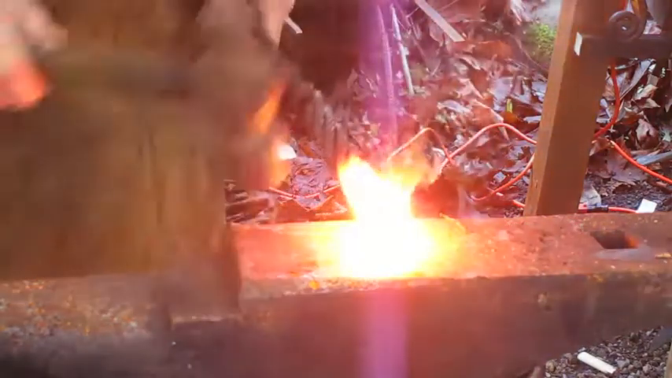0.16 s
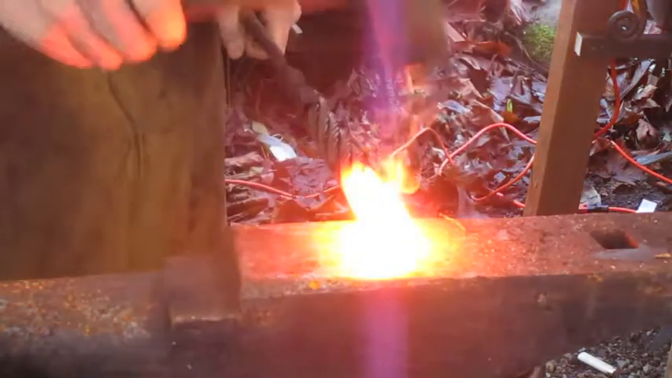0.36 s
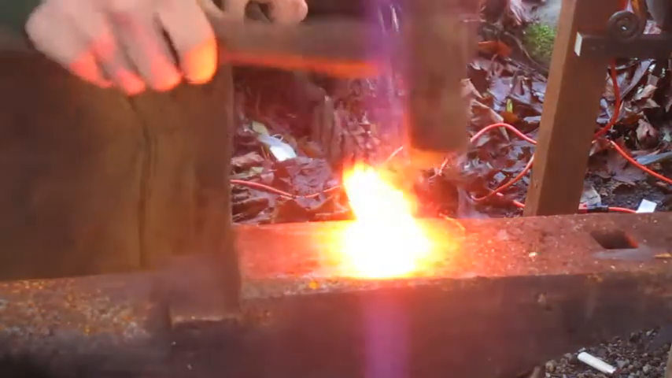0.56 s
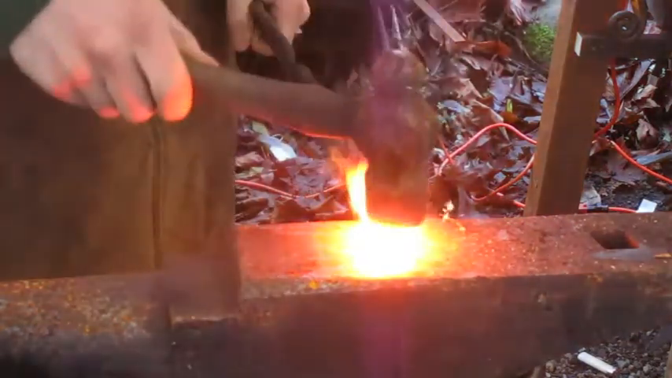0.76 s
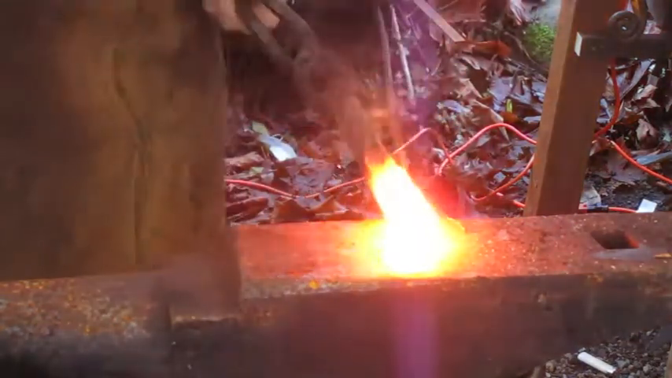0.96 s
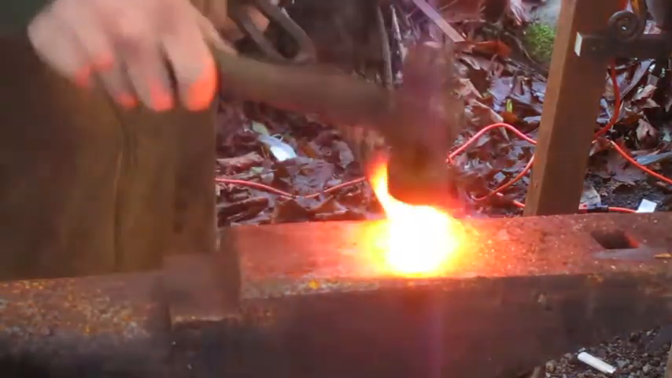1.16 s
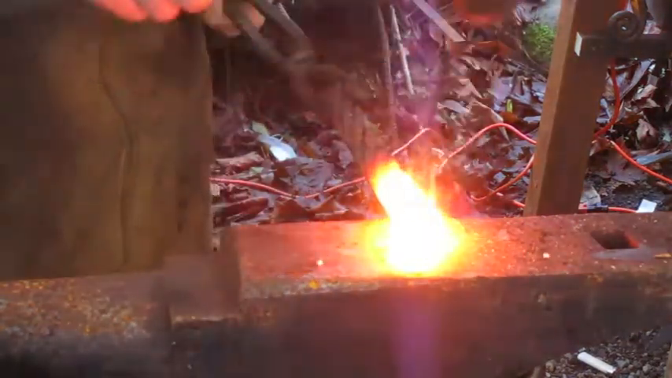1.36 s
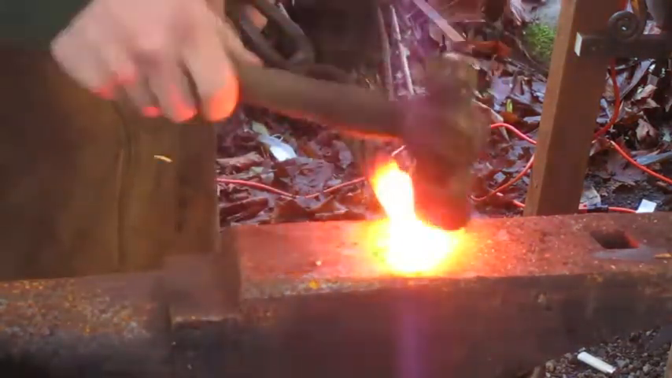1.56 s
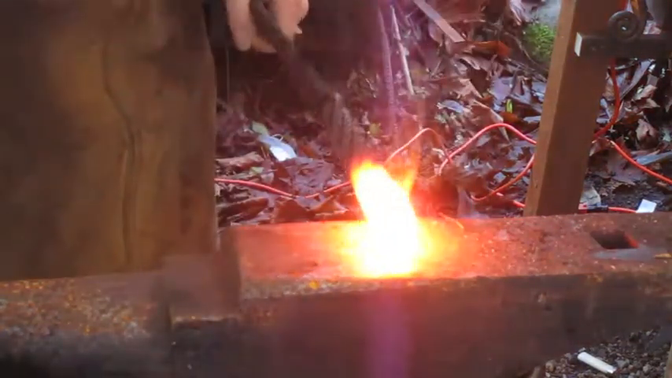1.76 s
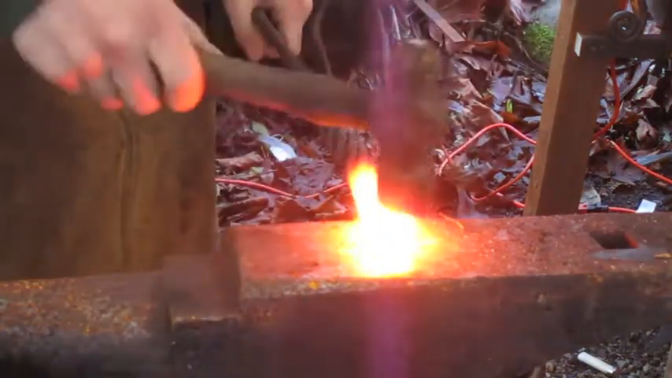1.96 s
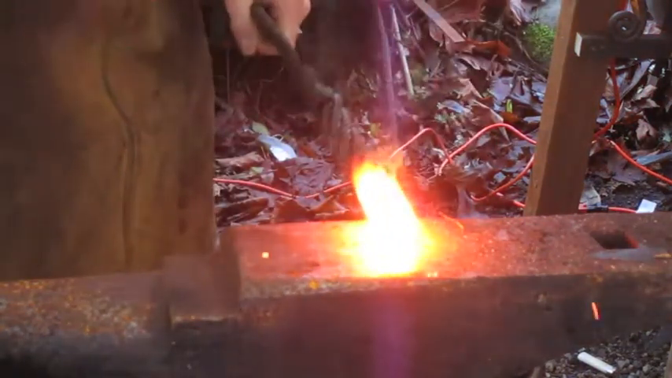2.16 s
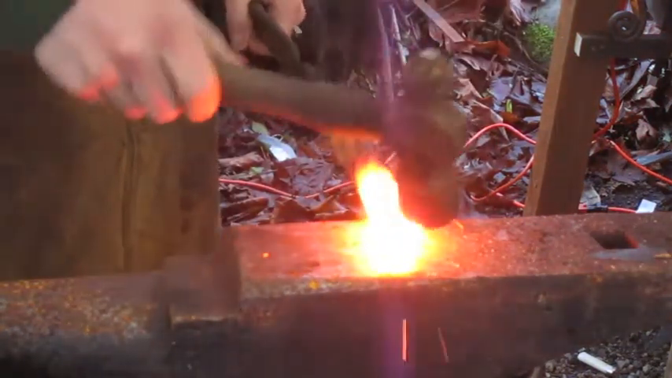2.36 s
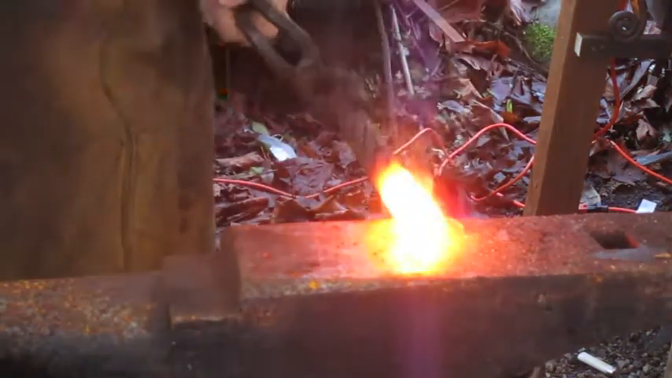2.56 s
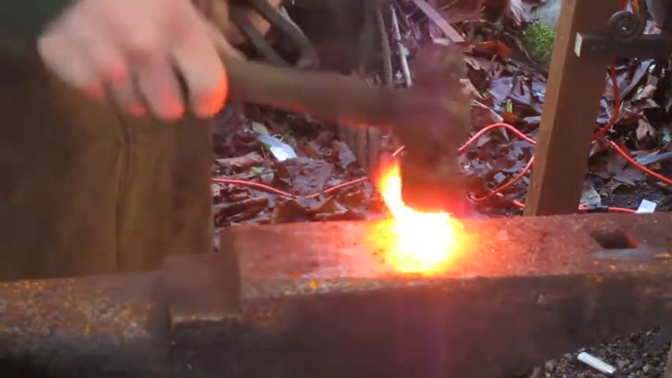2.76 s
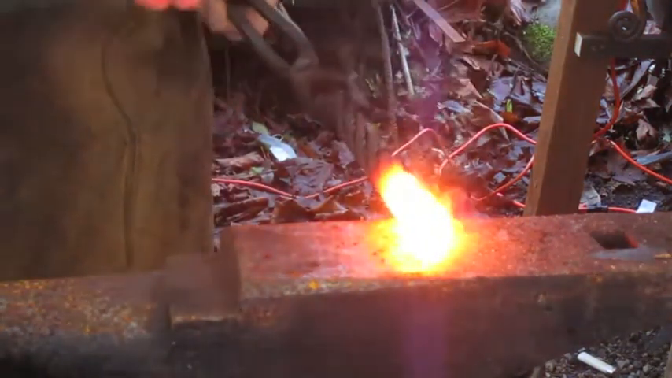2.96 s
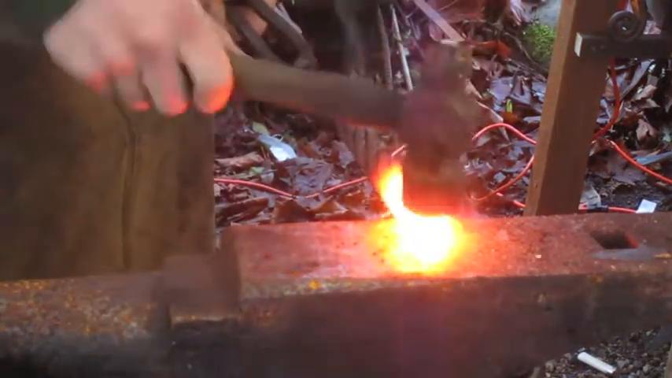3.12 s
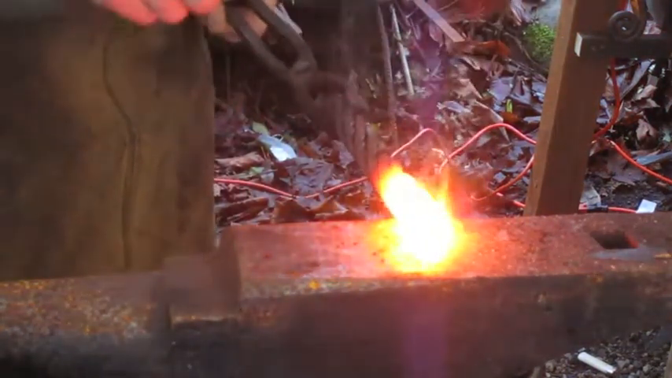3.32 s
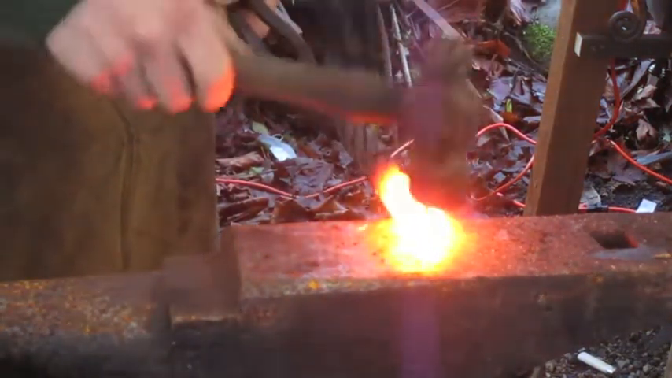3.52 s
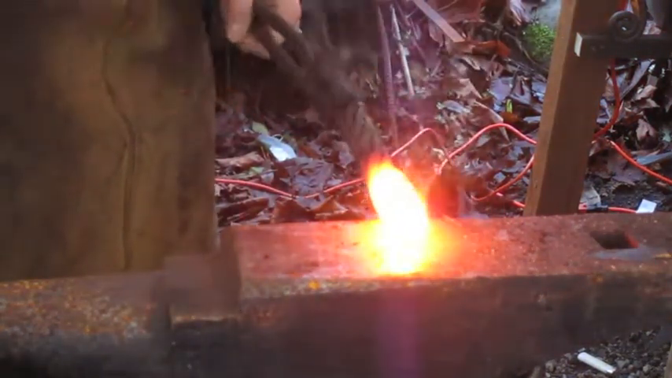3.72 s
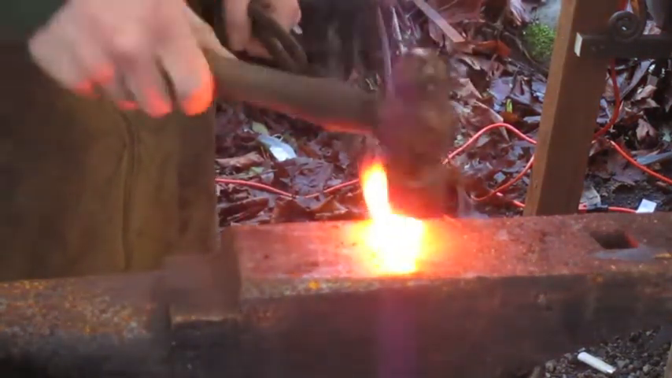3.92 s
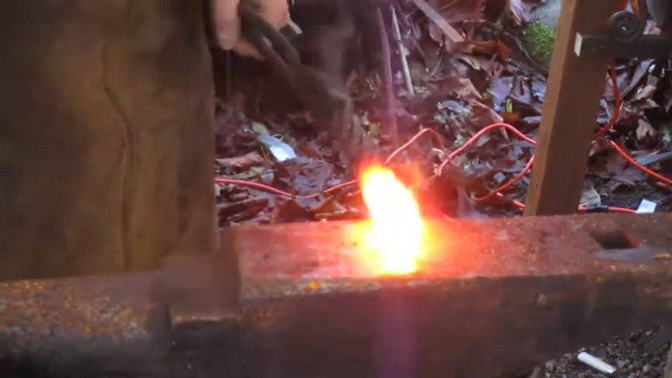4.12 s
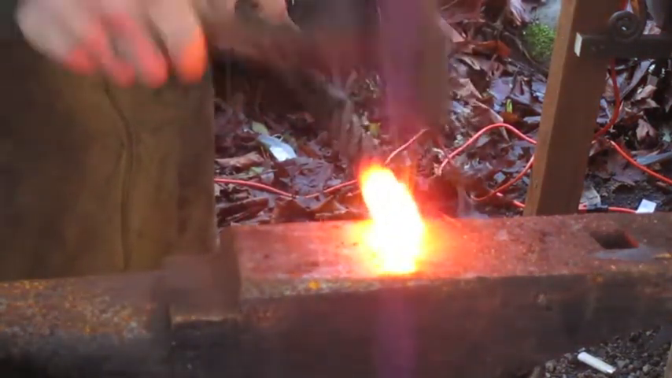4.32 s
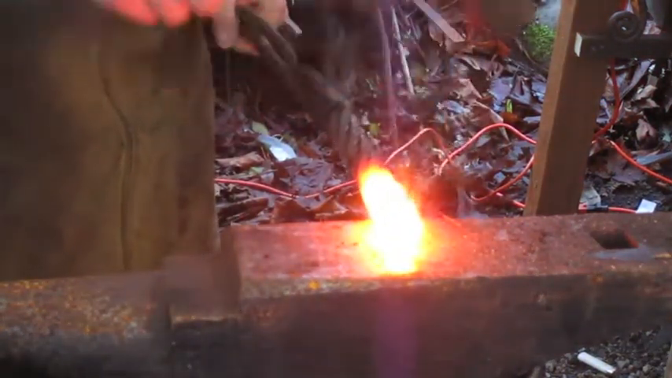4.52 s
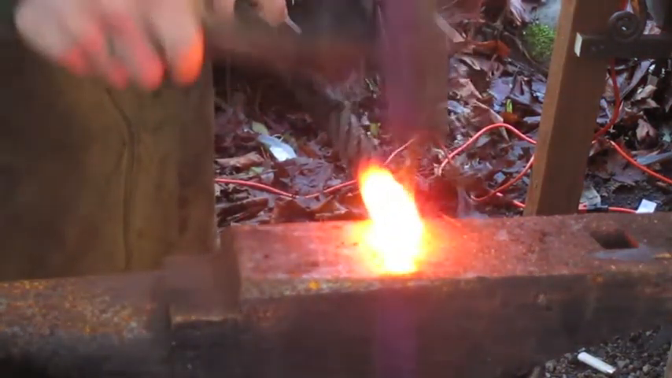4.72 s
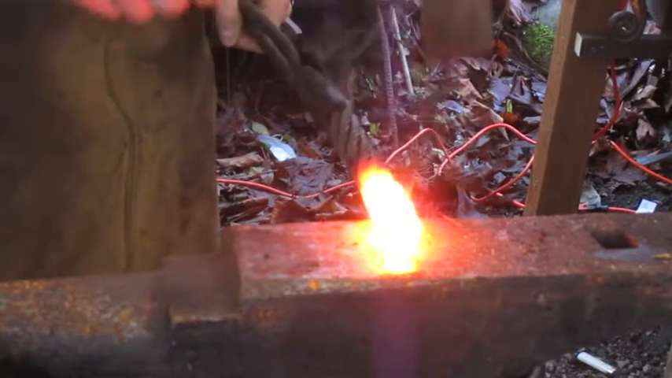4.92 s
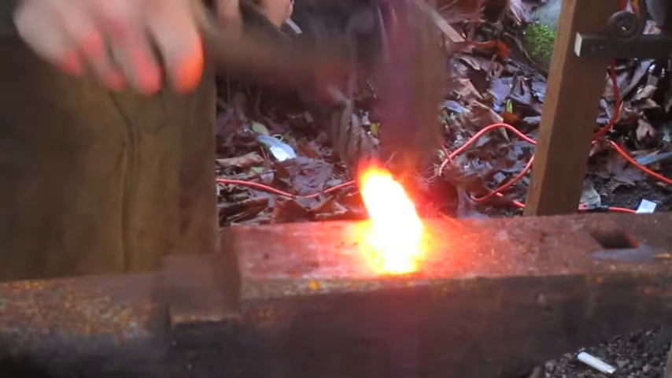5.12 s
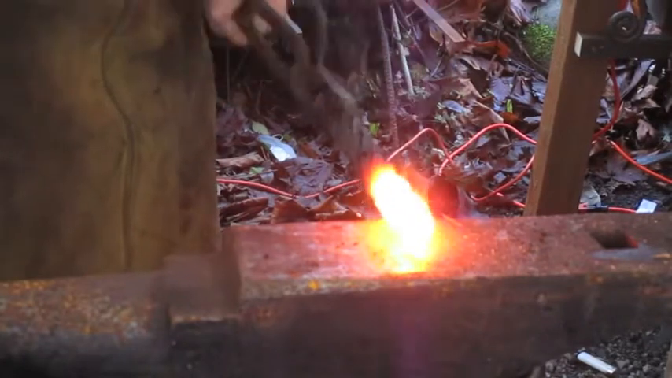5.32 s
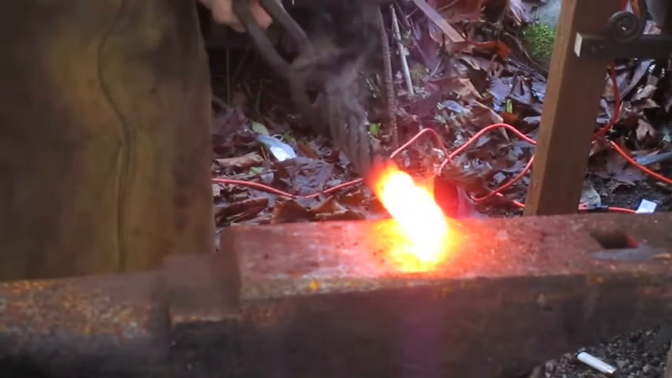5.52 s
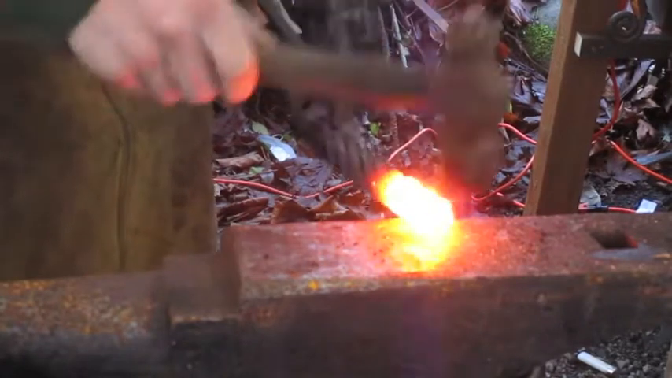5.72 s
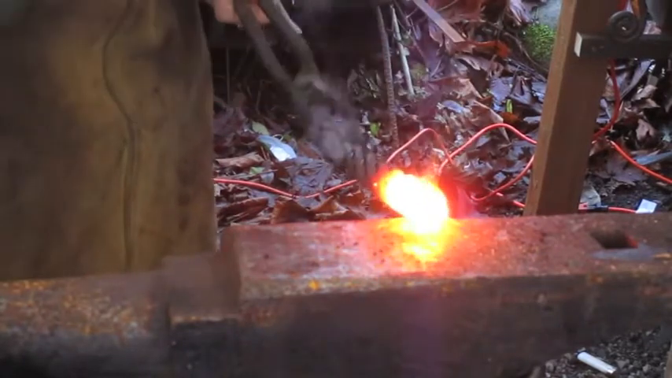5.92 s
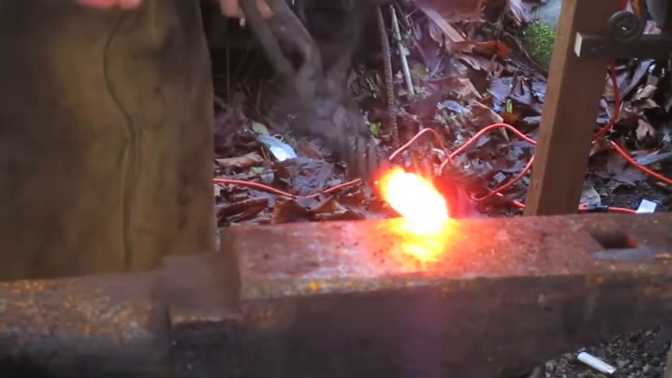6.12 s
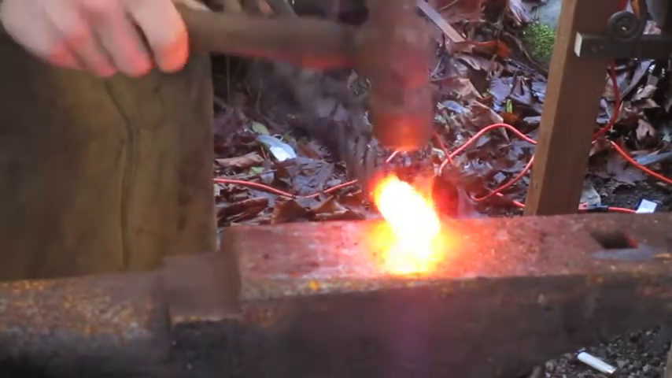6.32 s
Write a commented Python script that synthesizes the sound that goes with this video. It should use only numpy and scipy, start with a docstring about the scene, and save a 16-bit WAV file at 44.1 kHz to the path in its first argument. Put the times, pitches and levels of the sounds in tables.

```python
"""An outdoor forge, in mono: fourteen hand-hammer blows on a sparking-hot bar, mostly harder as they go.
Each is a noise crack, knock and scale crush, a short clank of damped sines, and a thud of stand and ground;
the anvil's sine modes ring through more in the later blows, as the bar cools. Ground and walls answer.
Filtered noise makes the fire's steady rush and the scale's hiss, random impulses its crackle, noise its pops.
Loud blows push the recorder's gain down, so the fire ducks and creeps back."""
import sys
import numpy as np
from scipy import signal
from scipy.fft import rfft, irfft, next_fast_len
from scipy.io import wavfile
from scipy.ndimage import uniform_filter1d, map_coordinates

SR = 44100
rng = np.random.default_rng(int(sys.argv[2]) if len(sys.argv) > 2 else 0)


def to_wav(s):
    """Save 16-bit WAV."""
    ch = np.atleast_2d(s).T  # columns
    pcm = np.round(np.clip(ch, -1, 1) * 32767)  # PCM
    wavfile.write(sys.argv[1], SR, pcm.astype(np.int16))


N = 281572

# Hammer blows. Each row: start in seconds, contact force in relative dB, thud in relative dB,
# squareness from -1 glancing to 1 flat on, then in relative dB against the force:
# clank, ring of the anvil's low modes, ring of its upper modes.
HAMMER_BLOWS = [(0.4798, -2.5, -20, .2, -15.5, -38, -39), (0.7655, -2.5, -18, -0.55, -18, -28, -36),
                (1.2064, -3, -18.5, 0.61, -23.5, -26.5, -42), (1.5471, -1.5, -11, -0.46, -17, -31, -42),
                (1.9946, -0.5, -16.5, .4, -16.5, -25, -45), (2.3548, 5, -11.5, 0.24, -15.5, -23.5, -45),
                (2.8006, 8, -14, 0.94, -19, -34, -48), (3.158, 12, -12.5, -0.33, -24.5, -24, -31.5),
                (3.504, 10, -15, 0.64, -17, -25, -36), (3.952, 3.5, -14.5, 0.39, -19.5, -30.5, -39),
                (4.3914, 11, -13, -0.29, -20, -29.5, -38), (4.7907, 10.5, -12, -.9, -19.5, -26, -27),
                (5.1832, 14, -12.5, 0.1, -22, -31.5, -24), (5.7035, 4, -12.5, 0.078, -18, -25.5, -29.5)]
# Modes of the anvil. Each row: frequency in Hz, relative level in dB, time to fall 60 dB in seconds.
ANVIL_MODES = [(1793, 0, .23), (1879, -9, .23), (2088, -3, .13), (3753, 0, .28), (3951, -14, .2),
               (6459, -8, .1), (8252, 0, .19), (12820, -11, .17)]
# Where the low, middle and high ring levels apply on the anvil. One column: frequency in Hz.
RING_ANCHORS = [1800, 3750, 8250]
# Modes of the anvil's stand. Each row: nominal frequency in Hz, relative level in dB,
# time to fall 60 dB in seconds, share fed by the hard knock rather than the soft thud, 0 to 1.
STAND_MODES = [(182, -23.5, 0.11, 0), (205.4, -2.5, 0.048, 0.11), (241, -5, 0.054, 0.37),
               (306.5, -7, 0.058, 0.52), (453, -8.5, 0.056, 0.58), (937, -6.5, 0.033, 1)]
# Spectra of the hammer's crack, the crushed scale, the knock, the forge fire, the fizzing scale and
# its sparks. Each row: frequency in Hz, relative level in dB.
CRACK_SPECTRUM = [(500, -43), (1400, 1), (2900, 3), (4000, 3.5), (5500, -6.5), (7000, -14), (9000, -7),
                  (11000, -19.5), (15000, -23.5)]
CRUSH_SPECTRUM = [(400, 3.5), (1200, -11.5), (2800, 6), (4500, -1), (6200, 0), (8500, -4.5), (11500, -9),
                  (15000, -22)]
KNOCK_SPECTRUM = [(100, -7), (350, -5), (650, 8), (930, 9.5), (1200, 4), (1600, 7), (2600, -19.5)]
FIRE_SPECTRUM = [(15, -38), (25, -18), (37, 2.5), (54, 5.5), (134, -2.5), (168, -12), (430, -9),
                 (494, -6.5), (1040, 0), (1190, -6.5), (1320, -7), (1430, -9), (3000, -24), (3900, -29),
                 (6600, -120)]
FIZZ_SPECTRUM = [(1200, -31), (2500, -0.5), (4500, 4), (7000, 1.5), (9300, 3.5), (12000, -0.5), (15000, -6)]
SPARK_SPECTRUM = [(1500, -26), (3500, -10), (6500, -5), (10000, 0), (15000, -.5)]
# The largest flakes of scale burst off the bar. One column: start in seconds.
FLAKE_TIMES = [1.7686, 1.8961, 2.0652, 2.1027, 3.6397, 3.801, 3.883, 4.1356, 4.341, 4.726, 4.9724, 5.0607,
               5.2833]
# Reflections from the ground and nearby walls. Each row: delay in seconds, level in dB.
REFLECTIONS = [(.0053, -25), (.007, -14), (0.0123, -20.5), (0.0205, -18.5)]
# The fire's rush settles early on. Each row: time in seconds, relative level in dB.
RUSH_LEVEL = [(0, -33), (.7, -35.5), (.9, -38), (1.4, -36.5), (6.38, -38.5)]

TIME = np.arange(N) / SR  # seconds
AGE = np.arange(SR // 2) / SR  # seconds since a contact
# The clank rises towards its pitch as the first blows seat the bar.
CLANK_HZ, CLANK_RISE_HZ, SETTLE_S = 2063, 132, 0.3
# Crack of a blow at 0 dB of force, neither flat nor glancing.
CRACK_DB, TILT_DB_PER_KHZ = -7, 0.52
# What landing flat (squareness 1) adds to the crack, the top ring and the brightness.
SQUARE_CRACK_DB, SQUARE_TOP_DB, SQUARE_DB_PER_KHZ = 0.5, -3, 1.07
SQUARE_SHORTENS_DB = 1.55  # contact length lost when flat, as an amplitude ratio in dB
CRUSH_DB, CRUSH_GROWS = -22, 0.72  # crushed scale, and its dB per dB of force
# Relative knock level, and its dB per dB of force and of thud.
KNOCK_DB, KNOCK_GROWS, KNOCK_FOLLOWS_THUD = -11.5, 0.92, 0.68
TOP_RING_DB = -8  # highest anvil modes against the upper ring level
# The fizz grows as the scale is broken up; its ticks and pops grow with it.
FIZZ_DB, FIZZ_DB_PER_S, TICKS_PER_S = -48.4, 0.93, 560
TICKS_DB, POP_DB = -2.6, 30.4  # tick rms and pop peak against the fizz
RUMBLE_DB = -44
GAIN_LIMIT_DB, RECOVER_DB_PER_S, SENSE_HZ = -15, 5, 500  # the recorder's gain control
TOP_HZ = 15150  # the recorder's band limit


def amp(db):
    """Decibels to gain."""
    return 10 ** (np.asarray(db) / 20)


def unit(x):
    """Scale to rms 1."""
    return x / np.sqrt(np.mean(x ** 2) + 1e-20)


def fade(t60):
    """Free decay after a contact, falling 60 dB in t60 seconds."""
    return amp(-60 * AGE / max(t60, 1e-4))


def swell(rise):
    """Exponential build-up after a contact, with a time constant in seconds."""
    return 1 - np.exp(-AGE / max(rise, 1e-5))


def add(track, s, sound):
    """Mix a sound into a track at s seconds, cut off at the track's end."""
    part = track[max(round(s * SR), 0):][:len(sound)]
    part += sound[:len(part)]


def filtered(x, response):
    """Multiply the spectrum of x by a response given as a function of Hz."""
    size = next_fast_len(len(x) + SR // 8)  # room for the filter's tail
    spectrum = rfft(x, size) * response(np.fft.rfftfreq(size, 1 / SR))
    return irfft(spectrum, size)[:len(x)]


def low_pass(hz, corner_hz, order):
    """Gain that falls smoothly above a corner frequency."""
    return 1 / (1 + (hz / corner_hz) ** order)


def coloured(x, points, tilt=0):
    """Shape x by a spectrum of (Hz, dB) points, tilted in dB per kHz, at rms 1."""
    f, db = np.transpose(points)
    db = db + tilt * f / 1000
    return unit(filtered(x, lambda hz: amp(np.interp(np.log(hz + 1), np.log(f), db))))


def burst(points, envelope, tilt=0):
    """Coloured noise under an envelope, with the envelope's energy every time."""
    noise = coloured(rng.standard_normal(len(AGE)), points, tilt) * envelope
    return noise * np.linalg.norm(envelope) / np.linalg.norm(noise)


def wobble(rate):
    """A smooth random curve through a given number of knots a second."""
    knots = rng.standard_normal(int(N * rate / SR) + 4)
    return map_coordinates(knots, [TIME * rate])


def hammering():
    """Each blow excites sharp contacts, ringing steel and thuds, returned as three tracks."""
    contacts, steel, thuds = np.zeros((3, N))
    for s, force_db, thud_db, square, clank_db, low_db, upper_db in HAMMER_BLOWS:
        crack_db = force_db + CRACK_DB + SQUARE_CRACK_DB * square
        crush_db = CRUSH_DB + CRUSH_GROWS * force_db
        knock_db = KNOCK_DB + KNOCK_GROWS * force_db + KNOCK_FOLLOWS_THUD * thud_db
        tilt = TILT_DB_PER_KHZ + SQUARE_DB_PER_KHZ * square
        give = amp(-SQUARE_SHORTENS_DB * square)  # a glancing contact is longer and blunter
        # the face first grazes the scale, then lands
        add(contacts, s - .003, amp(crush_db - 27) * burst(CRUSH_SPECTRUM, fade(0.0074)))
        add(contacts, s, amp(crack_db) * crack(tilt, t60=0.0105 * give, push=2.3 / give))
        crush_envelope = fade(0.099) * swell(0.0007)
        add(contacts, s, amp(crush_db) * burst(CRUSH_SPECTRUM, crush_envelope, tilt / 2))
        knock_envelope = fade(0.036) * swell(0.00012)
        add(contacts, s, amp(knock_db + 5.5) * burst(KNOCK_SPECTRUM, knock_envelope))

        clank_hz = CLANK_HZ - CLANK_RISE_HZ * np.exp((HAMMER_BLOWS[0][0] - s) / SETTLE_S)
        clank_gain = amp(force_db + clank_db + 2.5)
        add(steel, s, clank_gain * clank(clank_hz, spread=0.0832, t60=0.056, count=9))
        top_db = upper_db + TOP_RING_DB + SQUARE_TOP_DB * square
        ring_db = force_db + np.array([low_db, upper_db, top_db])
        add(steel, s, anvil_ring(ring_db, scatter_db=1))

        add(thuds, s, amp(13.5) * stand(thud_db, knock_db, scatter_db=1.5))
        bounce = ground(rest_hz=65.7, stiff_hz=59.3, relax=0.039, t60=0.11)
        add(thuds, s, amp(thud_db + 17) * bounce)
    return contacts, steel, thuds


def crack(tilt, t60, push):
    """The hammer face lands: one sharp push of air, then a brief splutter as the scale shatters."""
    envelope = fade(t60) * swell(.00025)
    force = rng.standard_normal(len(AGE)) * envelope
    force[np.argmax(envelope)] += push
    return coloured(force, CRACK_SPECTRUM, tilt) * np.sqrt(np.mean(fade(t60) ** 2))


def clank(hz, spread, t60, count):
    """Hammer, bar and tongs, pressed together, ring in a cluster of damped modes."""
    pitch = hz * np.exp(spread * rng.standard_normal((count, 1)))
    pitch[0] = hz
    size = np.where(np.arange(count) == 0, 1, .4)  # the first mode leads
    modes = np.sin(2 * np.pi * (pitch * AGE + rng.random((count, 1))))
    ring = size @ modes * fade(t60) * swell(0.00096)
    return ring * np.linalg.norm(fade(t60)) / np.linalg.norm(ring)


def anvil_ring(levels_db, scatter_db):
    """Where the hammer lands decides how strongly the low, middle and high modes ring."""
    ring = 0
    for hz, db, t60 in ANVIL_MODES:
        level = db + np.interp(hz, RING_ANCHORS, levels_db) + scatter_db * rng.standard_normal()
        ring = ring + amp(level) * fade(t60) * np.sin(2 * np.pi * (hz * AGE + rng.random()))
    return ring * swell(0.009)


def stand(thud_db, knock_db, scatter_db):
    """The stand is pushed down; a harder contact reaches more of its upper modes."""
    seat = np.exp(0.028 * rng.standard_normal())  # it never seats quite the same
    ring = 0
    for hz, db, t60, hard in STAND_MODES:
        drive_db = thud_db + hard * (knock_db - thud_db)
        level = db + drive_db + scatter_db * rng.standard_normal()
        ring = ring - amp(level) * fade(t60) * np.sin(2 * np.pi * seat * hz * AGE)
    return ring * swell(0.0045)


def ground(rest_hz, stiff_hz, relax, t60):
    """The ground under the stand bounces, sinking in pitch as the load eases."""
    turns = np.cumsum(rest_hz + stiff_hz * np.exp(-AGE / relax)) / SR
    return np.cos(2 * np.pi * turns) * swell(0.029) ** 2 * fade(t60)


def reflections(contacts):
    """Ground and nearby walls return delayed, weaker copies of the sharp contacts."""
    echoes = np.zeros(N)
    for delay, db in REFLECTIONS:
        add(echoes, delay, amp(db) * contacts)
    return echoes


def yard(x, tail_db, t60):
    """A short diffuse answer from the things standing around, a little different for every blow."""
    answer = np.zeros(N)
    starts = [round(s * SR) for s, *_ in HAMMER_BLOWS]
    for start, end in zip(starts, starts[1:] + [N]):
        tail = rng.standard_normal(len(AGE)) * fade(t60) * swell(0.0081)
        add(answer, start / SR, signal.fftconvolve(x[start:end], tail / np.linalg.norm(tail)))
    return amp(tail_db) * answer


def sizzle(fizz_db, spread_db):
    """Burning scale: a fine hiss, countless tiny ticks of random size and a few louder pops."""
    hiss = amp(fizz_db + 1.7 * wobble(52)) * coloured(rng.standard_normal(N), FIZZ_SPECTRUM)
    size_db = spread_db * np.minimum(rng.exponential(size=N), 3.7)
    sizes = amp(size_db) * rng.choice([-1, 1], N)
    struck = rng.random(N) < TICKS_PER_S / SR
    ticks = amp(fizz_db + TICKS_DB) * coloured(sizes * struck, SPARK_SPECTRUM)
    pops = np.zeros(N)
    for s in FLAKE_TIMES:
        pop = burst(SPARK_SPECTRUM, fade(0.0028))
        add(pops, s, pop / np.abs(pop).max())
    return hiss + ticks + amp(fizz_db + POP_DB) * pops


def forge(rumble_db, rush_db, split_hz):
    """The fire rushes in mid pitches over a low, unsteady rumble, both filtered from one noise."""
    fire = coloured(rng.standard_normal(N), FIRE_SPECTRUM)
    low = filtered(fire, lambda hz: low_pass(hz, split_hz, 4))
    rumble = amp(rumble_db + 2.3 * wobble(20)) * unit(low)
    rush = amp(rush_db + 0.5 + 0.55 * wobble(20.94)) * unit(fire - low)
    return rumble + rush


def gain_control(x, size):
    """Gain drops at once to hold the next size samples (bass aside) to the limit, then creeps back."""
    sensed = filtered(x, lambda hz: 1 - low_pass(hz, SENSE_HZ, 4))
    power = np.abs(uniform_filter1d(sensed ** 2, size, origin=-(size // 2)))  # looks ahead
    allowed_db = np.minimum(GAIN_LIMIT_DB - 10 * np.log10(power + 1e-12), 0)
    creep_db = RECOVER_DB_PER_S * TIME
    gain_db = np.minimum.accumulate(allowed_db - creep_db) + creep_db
    return x * amp(gain_db)


def scene():
    """Blows with their echoes, over the fire and the sizzling bar."""
    contacts, steel, thuds = hammering()
    blows = contacts + steel + thuds + reflections(contacts)
    blows = blows + yard(contacts + steel, tail_db=-12.5, t60=0.15)
    rush_db = np.interp(TIME, *np.transpose(RUSH_LEVEL))
    fire = forge(RUMBLE_DB, rush_db, split_hz=118)
    bar = sizzle(FIZZ_DB + FIZZ_DB_PER_S * TIME, spread_db=15)
    return (blows + fire + bar)[None]


def record(dry):
    """The recorder rides its gain, rounds off the highest peaks and cuts steeply above its band limit."""
    held = gain_control(dry[0], size=512)
    rounded = held / (1 + np.abs(held) ** 6) ** (1 / 6)
    return filtered(rounded, lambda hz: low_pass(hz, TOP_HZ, 200))[None]


dry = scene()
out = record(dry)
to_wav(out)
```